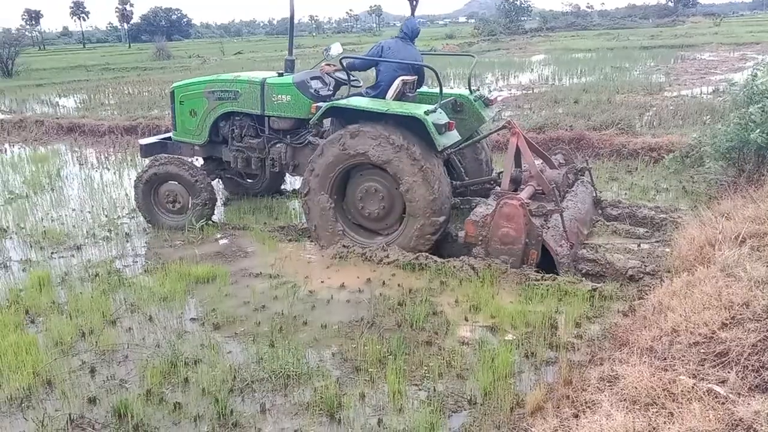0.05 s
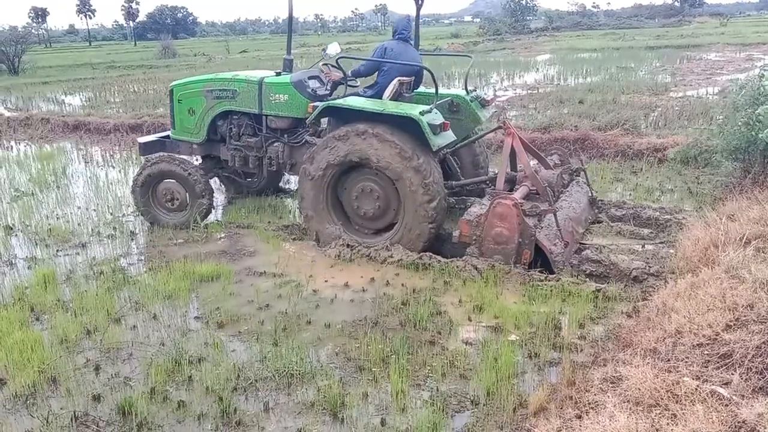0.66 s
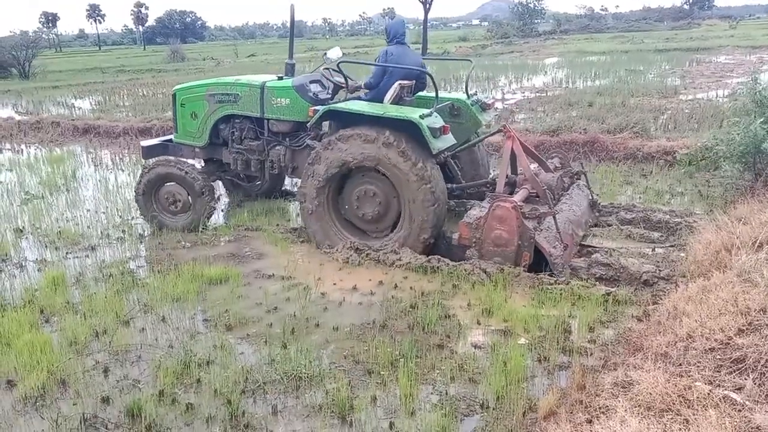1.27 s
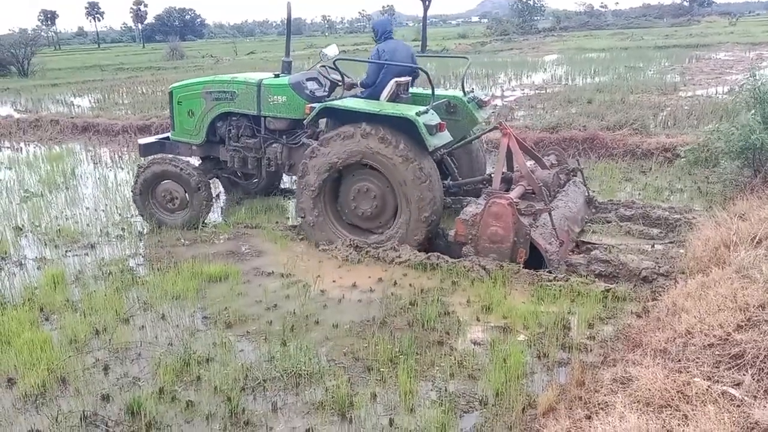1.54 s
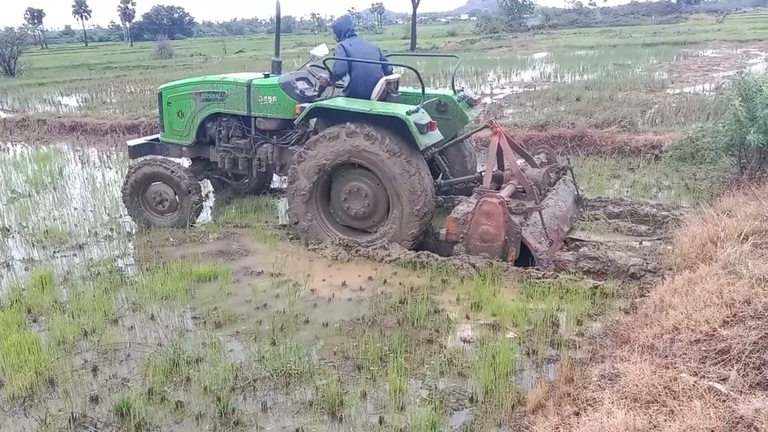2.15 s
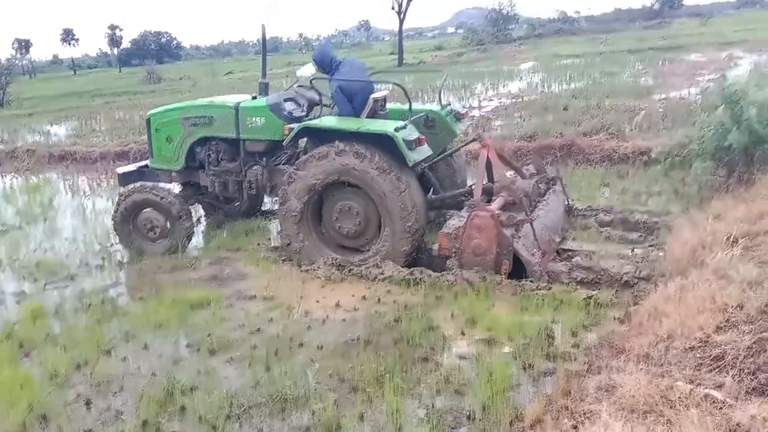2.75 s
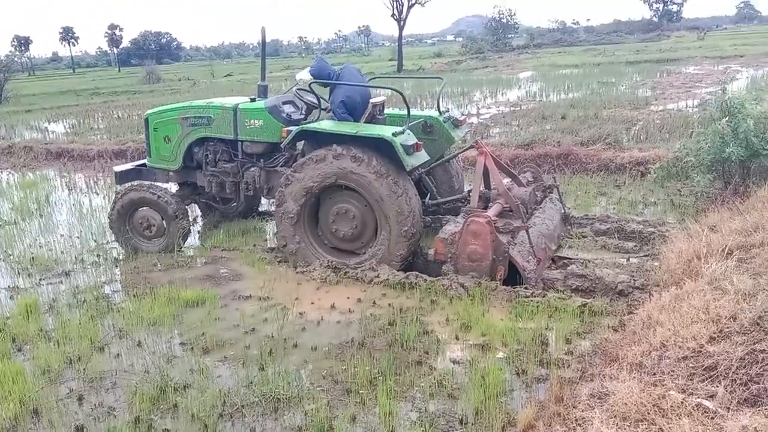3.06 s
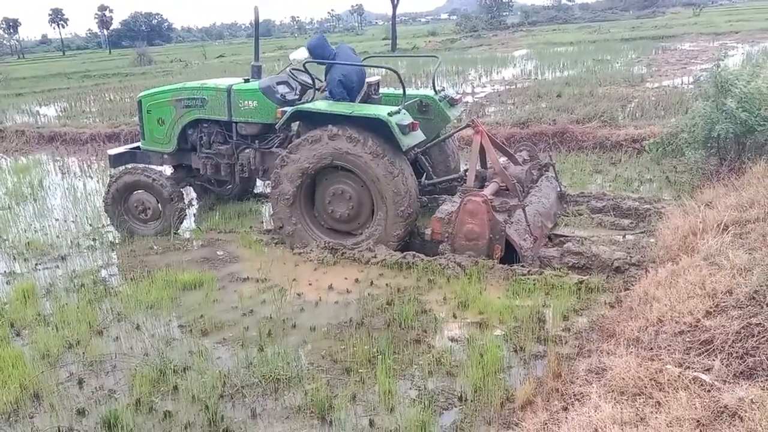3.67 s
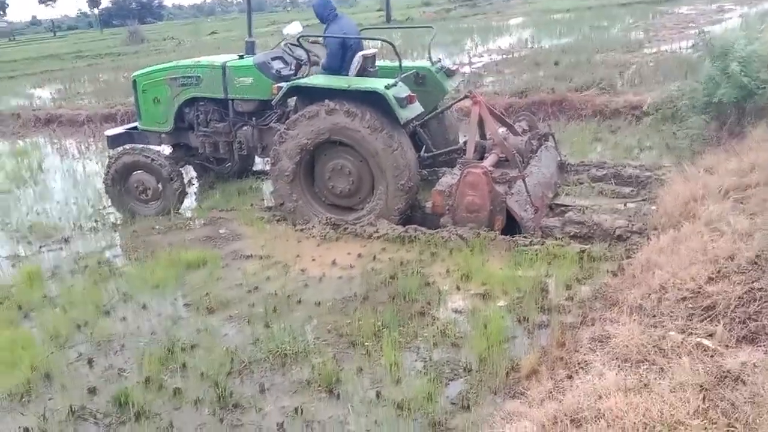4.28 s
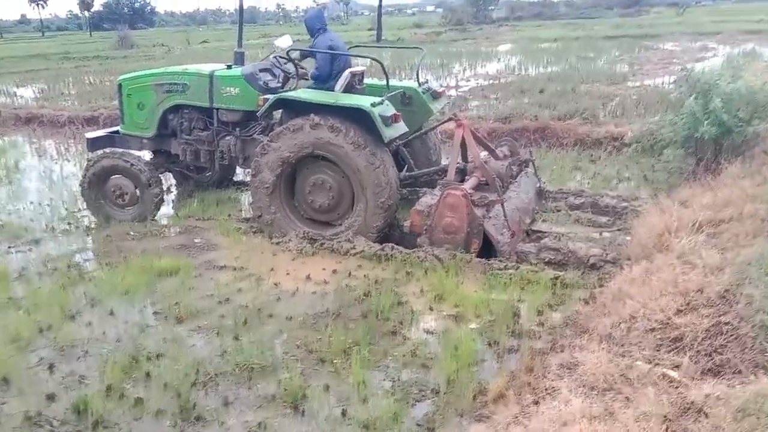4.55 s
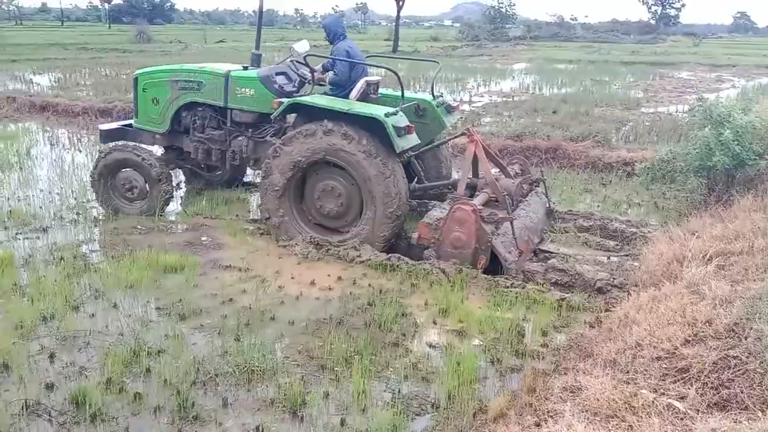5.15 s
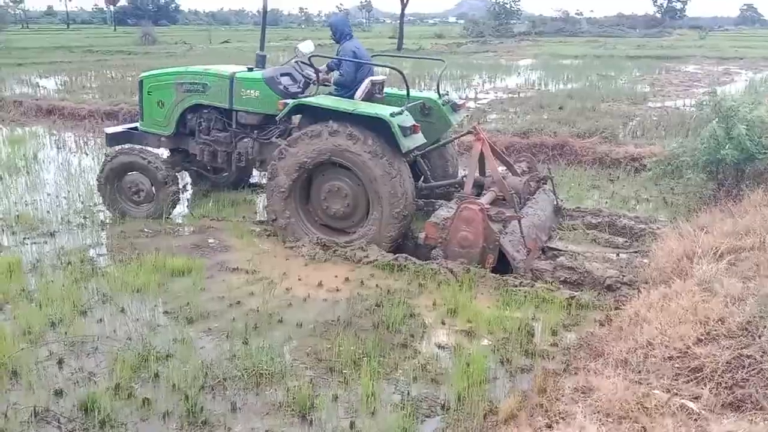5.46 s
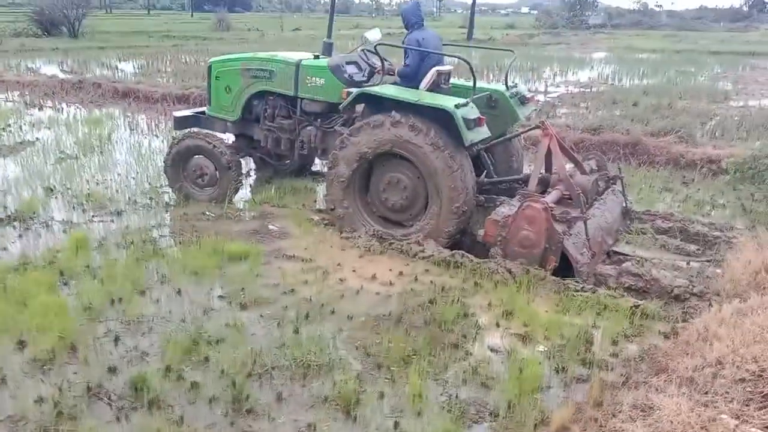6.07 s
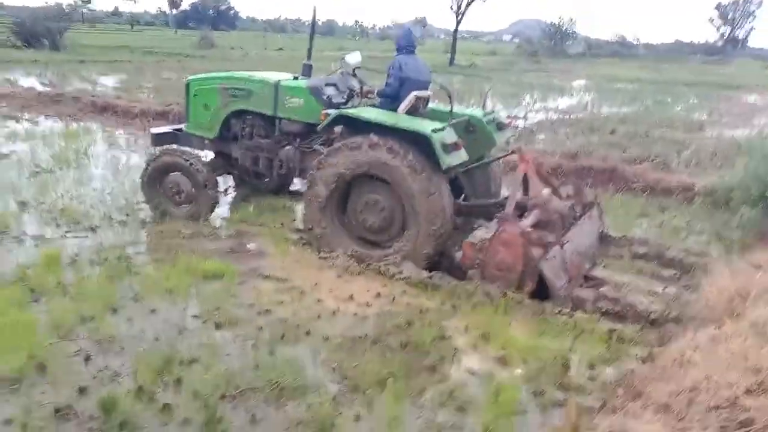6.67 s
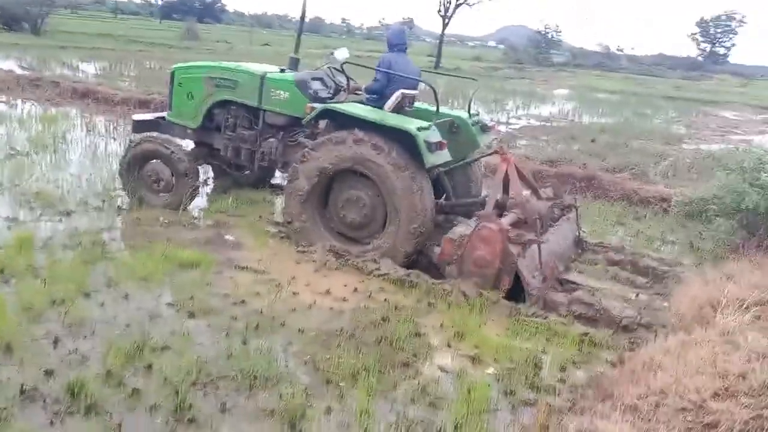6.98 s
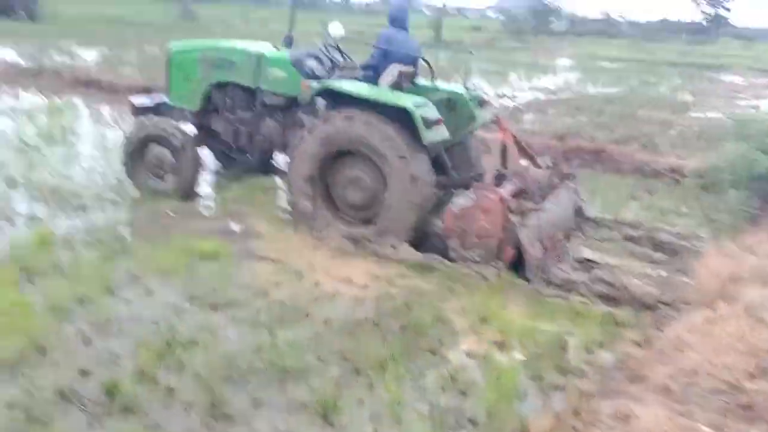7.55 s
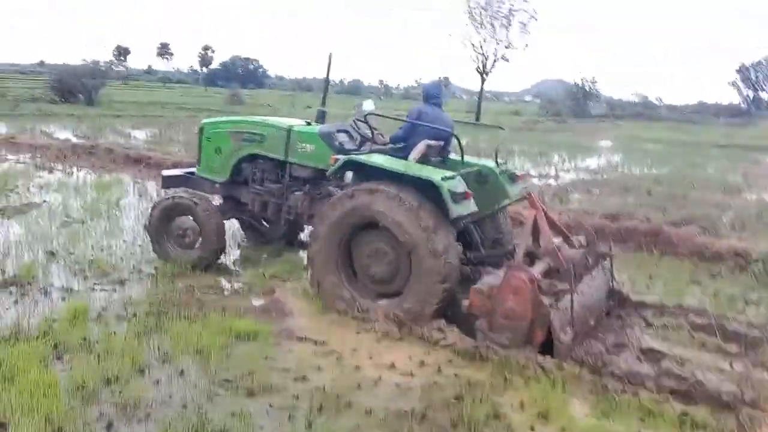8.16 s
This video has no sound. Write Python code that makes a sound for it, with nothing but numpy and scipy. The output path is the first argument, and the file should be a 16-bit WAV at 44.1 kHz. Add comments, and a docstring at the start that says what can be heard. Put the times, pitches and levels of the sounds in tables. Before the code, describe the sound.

Wind rumbles on the microphone as a slowly chugging tractor engine speeds up into a louder, rattling drone under load.

```python
"""A wet paddy: a three-cylinder diesel tractor knocks at idle, then revs up near 5 s and pulls its tiller.
Each firing is a train of impacts that excites the resonances of the block and covers, and sends a
pressure pulse out of the stack. The rotary blades spatter mud; metal ticks, clanks and chirps faintly.
Throughout, the turbulent pressure of gusty wind buffets the microphone."""
import sys
import numpy as np
from scipy import signal
from scipy.fft import rfft, irfft, next_fast_len
from scipy.io import wavfile
from scipy.ndimage import uniform_filter1d, minimum_filter1d, map_coordinates

SR = 44100
rng = np.random.default_rng(int(sys.argv[2]) if len(sys.argv) > 2 else 0)


def master_out(mix):
    """Clip the mix to full scale and print it as 16-bit PCM to the path in sys.argv[1]."""
    frames = np.transpose(np.atleast_2d(mix))
    ceiling = np.clip(frames, -1, 1)
    pcm = np.round(ceiling * 32767).astype(np.int16)
    wavfile.write(sys.argv[1], SR, pcm)


N = 366912

# strength of the knock: t/s, level/dB
KNOCK_LEVEL = [(0, -32.5), (.3, -29.5), (1.76, -30), (2.04, -38.5), (2.26, -32), (2.36, -33), (2.82, -36),
               (3.05, -31.5), (3.75, -35.5), (4.5, -32), (4.93, -30.5), (5.0, -27), (5.3, -22.5),
               (5.48, -28.5), (5.82, -29.5), (6.0, -30.5), (6.38, -22.5), (7.0, -21.5), (7.22, -26.5),
               (7.37, -20), (7.9, -19.5), (8.32, -22.5)]
# treble relative to the knock: t/s, rasp and crack level/dB, sizzle level/dB
TREBLE_BALANCE = [(0, -5.5, -18.5), (1.8, -6.5, -18), (2.03, -10.5, -22.5), (2.24, -8.5, -21.5),
                  (2.4, -8, -22), (4.0, -6, -19.5), (5.3, -7, -20.5), (5.74, -8, -17), (5.9, -47, -28),
                  (7.15, -23.5, -29.5), (7.6, -16.5, -24), (8.32, -22.5, -25)]
COAST_START_S, COAST_HOLD_S, COAST_DB = 1.92, .375, -21  # a brief fuel cut weakens the combustion
def engine():
    """Impact excitation: each firing sets the metal ringing; load hardens it, speed brightens it."""
    knock_db, = curves(KNOCK_LEVEL)
    treble_db, sizzle_db = curves(TREBLE_BALANCE)
    burst = blows()
    sharp = levelled(burst ** 1.35)  # higher partials follow the blows more sharply
    body, rasp = block(burst, sharp)
    sizzle = covers(sharp)
    fizz, bite = revving(sharp)
    crack = amp(treble_db - 4) * ignition_crack(sharp)
    fuel = amp(COAST_DB * swell(COAST_START_S, COAST_HOLD_S, attack=0.12, release=0.019))
    treble = amp(treble_db - 1) * rasp + bite + amp(sizzle_db) * (sizzle + fizz)
    return amp(knock_db) * (fuel * (body + crack) + treble)


# ignition crack, combustion, piston slap, valve seating:
# start/periods, level/dB, decay/periods, change under load/dB
FIRING_BLOWS = [(.035, -7, 0.11, 4), (0.025, -2, 0.45, -4.5), (0.31, -11, 0.11, 7), (0.63, -13.5, .062, -4)]
def blows():
    """Incoherent addition: the blows and the steady clatter sum in power to one envelope."""
    load, clatter_db = effort()
    hardness = np.tanh(load / 0.17)
    power = sum((amp(db + loaded_db * hardness) * firings(start, decay, scatter_db=0.67)) ** 2
                for start, db, decay, loaded_db in FIRING_BLOWS)
    power = np.abs(uniform_filter1d(power, size=SR // 400))  # a knock takes time to spread
    accents = amp(0.7 * wobble(220))  # single impacts stand out in all bands at once
    return levelled(np.sqrt(power + amp(clatter_db + 0.5) ** 2) * accents)


# modes of the block, the hollow unloaded engine and the tiller housing: f/Hz, width/Hz, gain/dB
BLOCK_MODES = [(698, 98, 6.5), (824, 36, 3), (915, 77, 5), (1220, 51, 3), (1428, 56, 9.5), (1700, 63, 7),
               (2400, 210, 6.5), (2640, 29, 3.5), (3190, 80, 1.5), (3430, 160, 6), (3740, 140, 8),
               (4050, 120, 8.5)]
HOLLOW_MODES = [(1525, 79, 7), (1706, 70, -7.5), (2180, 180, -5)]
HOUSING_MODES = [(1317, 49, 8), (1470, 70, -1.5), (2210, 72, 2.5)]
# spectra of the idle knock, loaded drone, hard combustion ring and rasp: f/Hz, level/dB
IDLE_SPECTRUM = [(150, 1.5), (350, -11), (800, 6.5), (1150, 6.5), (1500, -1), (1850, -0.5), (2450, -3.5),
                 (3100, -2), (3500, -19), (4000, -42), (4600, -93)]
DRONE_SPECTRUM = [(150, 10), (350, -4.5), (800, 6.5), (1100, 1), (1500, 2), (1900, 0.5), (2400, 2),
                  (2850, 1.5), (3300, -16.5), (3800, -43.5), (4600, -75.5)]
RING_SPECTRUM = [(1200, -43.5), (2000, -1), (2400, -1.5), (2900, -0.5), (3300, -14.5), (3900, -30),
                 (4600, -74.5)]
RASP_SPECTRUM = [(2200, -34), (2800, 2.5), (3300, 14), (3600, 11), (4000, 1.5), (4250, -8.5), (4500, -28),
                 (4800, -35), (5300, -34.5), (6000, -14), (6600, -23), (8000, -73.5)]
def block(burst, sharp):
    """Modal resonance: impacts ring the block, hollow at idle, joined by the housing under load."""
    load, _ = effort()
    idle_modes, load_modes = BLOCK_MODES + HOLLOW_MODES, BLOCK_MODES + HOUSING_MODES
    idle = shimmer(coloured(burst * rattle(spread_db=1.1, alike=0.37), IDLE_SPECTRUM, idle_modes))
    blunt = levelled(np.sqrt(burst))
    drone = coloured(blunt * rattle(spread_db=0, alike=0.38), DRONE_SPECTRUM, load_modes)
    ring = shimmer(coloured(sharp * rattle(spread_db=1.5, alike=0.61), RING_SPECTRUM, load_modes))
    rasp = shimmer(coloured(sharp * rattle(spread_db=0, alike=0.74), RASP_SPECTRUM, BLOCK_MODES))
    working = amp(-0.54) * drone + amp(-5) * ring
    body = np.sqrt(1 - load) * amp(1.55) * idle + np.sqrt(load) * working
    return body, rasp


# sizzle of the thin engine covers: f/Hz, level/dB
SIZZLE_SPECTRUM = [(5000, -65.5), (5250, -35), (6100, -14.5), (6600, 3.5), (7300, 4), (8500, -1.5),
                   (9300, -24), (10200, -15.5), (11700, -31.5), (13000, -28), (14200, -32.5), (15500, -35)]
# their modes: f/Hz, width/Hz, gain/dB
COVER_MODES = [(5950, 200, 4), (6850, 460, 2.5), (7400, 250, -1), (7820, 240, 2.5), (8770, 350, 5.5),
               (9850, 440, 6)]
def covers(sharp):
    """Plate vibration: the covers snap on each knock until the working tiller keeps them shaking."""
    load, _ = effort()
    snap = levelled(sharp ** (1.3 + 0.8 * load - 1.15 * load * throttle()))
    return shimmer(coloured(snap * rattle(spread_db=2.5, alike=0.37), SIZZLE_SPECTRUM, COVER_MODES))


# bright fizz of the revved engine, and its bite before it takes the load: f/Hz, level/dB
FIZZ_SPECTRUM = [(4600, -46), (6000, -31), (6500, -3.5), (9000, 2), (10000, 1.5), (11700, -5.5),
                 (12900, -2.5), (14200, -14), (15500, -14.5)]
BITE_SPECTRUM = [(3300, -48), (4200, 10.5), (4600, -18), (5300, -5.5), (6200, 5), (7200, -2), (9000, -45)]
def revving(sharp):
    """Amplitude modulation: firings pulse the treble noise; speed under load evens it out."""
    load, clatter_db = effort()
    top_speed = np.clip((firing_rate() - 27) / 2, 0, 1)
    bang = np.hypot(firings(start=0, decay=.3, scatter_db=0.5), amp(clatter_db - 10))
    edge = levelled(bang ** (1 - load) * sharp ** (load * (1.4 - 0.7 * top_speed)))
    fizz = amp(-0.5) * shimmer(coloured(edge * grit(spread_db=2), FIZZ_SPECTRUM), depth_db=1)
    bite = amp(-22.5) * (1 - load) ** 2 * coloured(edge * grit(spread_db=7), BITE_SPECTRUM)
    return throttle() * fizz, throttle() * bite


# the crack at the front of each knock: f/Hz, level/dB
CRACK_SPECTRUM = [(700, -24), (1400, 2.5), (2000, -1.5), (2600, -1.5), (3600, 3.5), (4200, -6.5),
                  (4800, -27.5), (6500, -8), (8500, -24.5), (11000, -34.5)]
def ignition_crack(sharp):
    """Transient excitation: the brief peak of each knock drives the block over a wide band."""
    impacts = levelled(sharp ** 1.58) * grit(spread_db=2.5)
    return shimmer(coloured(impacts, CRACK_SPECTRUM, BLOCK_MODES))


# cylinders in firing order: idle level/dB, revved level/dB
CYLINDER_LEVELS = [(1.6, -.4), (-.4, -.6), (0, 1.1)]
# unusually hard or soft firings: t/s, level change/dB
ODD_FIRINGS = [(.39, -1.5), (.86, 1.5), (.92, 3), (1.51, 2.5), (1.71, 1), (2.13, -1.5), (2.315, 2),
               (2.38, 2.5), (2.56, 1), (2.685, 3), (2.8, 0), (2.985, 1.5), (3.047, 1), (3.4, 1.5),
               (3.952, -0.5), (4.135, 3), (4.455, 2), (4.518, -2), (4.707, -1), (5.15, 0), (5.28, 1.5),
               (5.32, 3), (5.36, 4), (7.4, 2), (7.525, 0), (7.75, 0.5)]
def firings(start, decay, scatter_db):
    """Exponential decay: one blow per firing, sized by its cylinder; start and decay in periods."""
    cycles, onsets = crank()
    k = np.arange(len(onsets))
    idle_db, revved_db = np.array(CYLINDER_LEVELS)[k % len(CYLINDER_LEVELS)].T
    db = idle_db + (revved_db - idle_db) * throttle()[onsets] + scatter_db * rng.standard_normal(len(k))
    for at, extra_db in ODD_FIRINGS:
        db[np.argmin(np.abs(onsets / SR - at))] += extra_db
    which, age = np.divmod(cycles - start, 1)
    return amp(db)[np.clip(which.astype(int), 0, len(k) - 1)] * np.exp(-age / decay)


def rattle(spread_db, alike):
    """Partial coherence: each cylinder repeats the share `alike` of its impact noise power."""
    cycles, onsets = crank()
    k = cycles.astype(int)
    pattern = grit(spread_db)[k % len(CYLINDER_LEVELS) * SR + np.arange(N) - onsets[k]]
    return np.sqrt(alike) * unit(pattern) + np.sqrt(1 - alike) * grit(spread_db)


# engine speed: t/s, firing rate/Hz
ENGINE_SPEED = [(0, 14.9), (.3, 14.9), (.38, 15.65), (.75, 14.59), (1.12, 15.55), (1.6, 15.05), (2.0, 16.9),
                (2.5, 16.21), (3.02, 16.69), (3.25, 16.74), (3.47, 16.44), (3.91, 16.68), (4.51, 15.17),
                (4.91, 17.21), (5.15, 21.49), (5.38, 26.42), (5.62, 27.47), (5.92, 28.44), (6.45, 29.07),
                (7.02, 29.51), (7.28, 26.83), (7.6, 25.89), (7.9, 27.83), (8.32, 28.54)]
def firing_rate():
    """Repetition frequency of the knock, in Hz."""
    return curves(ENGINE_SPEED)[0]


def crank():
    """Phase as the integral of frequency: firings elapsed, and the first sample of each."""
    cycles = .194 + np.cumsum(firing_rate()) / SR
    return cycles, np.searchsorted(cycles, np.arange(int(cycles[-1]) + 1))


def throttle():
    """Speed threshold: 0 at idle, 1 once revved."""
    return np.clip((firing_rate() - 18.5) / .2, 0, 1)


# how hard the engine works: t/s, load (0-1), relative clatter level/dB
ENGINE_EFFORT = [(0, 0.33, -8.5), (1.7, 0.25, -5.5), (2.05, 0.06, -10.5), (4.3, 0, -14.5),
                 (5.3, 0.18, -9.5), (5.6, 0.12, 5.5), (6.3, 0.96, -8.5), (8.32, 0.97, -8.5)]
def effort():
    """Mechanical load, and the steady clatter between firings."""
    return curves(ENGINE_EFFORT)


# timing gears and valves: f/Hz, level/dB
GEAR_SPECTRUM = [(500, -13), (930, 2.5), (1080, -0.5), (1250, -21.5), (1510, 3), (1800, -20.5), (2200, -14),
                 (2400, -3), (2650, -6), (3200, -1.5), (3600, -19.5), (4600, -57.5)]
def gears():
    """Contact noise: gears and valves rattle at every compression, with or without fuel."""
    shake = levelled(firings(start=.05, decay=0.69, scatter_db=1))
    return amp(-36.5) * coloured(shake * grit(spread_db=0.5), GEAR_SPECTRUM)


# puffs from the stack: f/Hz, level/dB
EXHAUST_SPECTRUM = [(25, -33), (55, 1), (100, 7), (170, -5), (300, -4), (600, -23.5), (1500, -69)]
def exhaust():
    """Monopole radiation: each puff sounds by its rate of change of flow, stronger with speed."""
    speed = firing_rate()
    flow = firings(start=.1, decay=0.12, scatter_db=4)
    pulse = coloured(np.gradient(flow), EXHAUST_SPECTRUM)
    rush = coloured(flow * rng.standard_normal(N), EXHAUST_SPECTRUM)
    return amp(-32.5) * (speed / speed.mean()) ** 1.4 * (pulse + 0.61 * rush)


# wet slaps of mud: f/Hz, level/dB
MUD_SPECTRUM = [(200, -28), (600, -3.5), (1400, 6.5), (3000, -46), (4500, -41)]
def tiller():
    """Shot noise: under load the blades throw a dense, random spray of small wet slaps."""
    load, _ = effort()
    when, size = rng.random((700, 2)).T
    spray = fading(impulses(when * N / SR, size), decay=0.0058) * rng.standard_normal(N)
    return amp(-32.5) * load * coloured(spray, MUD_SPECTRUM)


# sharp ticks and spatters, and the bright crack of a few hard firings near the start: t/s, relative level/dB,
# clack offset/dB, tick decay/s
CONTACTS = [(0.188, -27.5, -4, 0.0099), (0.26, -24.5, 13, 0.015), (0.324, -23, 8, 0.014),
            (0.755, -16, -16, .002), (0.925, -28, 4, .008), (1.58, -28, -5, 0.0074),
            (2.442, -22.5, 14, 0.0055), (2.450, -22.5, 18.5, .004), (2.466, -38.5, 18, .005),
            (2.892, -31, -12, 0.0044), (2.928, -21.5, -14, 0.004), (3.385, -28, 18.5, 0.004),
            (3.493, -31.5, 9, 0.0072), (7.630, -20, 14, 0.011)]
# spectra of the tick and the clack: f/Hz, level/dB
TICK_SPECTRUM = [(5000, -29), (6500, 9.5), (9000, 5.5), (12000, -6.5), (15500, -16.5)]
CLACK_SPECTRUM = [(800, -32), (2200, -14), (2900, 0), (3300, -5), (4000, -21), (4700, -69), (7000, -89)]
def ticks():
    """Impact transients: a bright tick over a lower clack that takes a moment to ring up."""
    times, db, clack_db, _ = np.transpose(CONTACTS)
    tick = sum(fading(impulses(np.array([at]), [amp(level_db - 13.5)]), decay)
               for at, level_db, _, decay in CONTACTS)
    strikes = impulses(times, amp(db + clack_db - 5.5))
    clack = (fading(strikes, .0036) - fading(strikes, .0011)) * steady_noise(CLACK_SPECTRUM)
    return tick * coloured(rng.standard_normal(N), TICK_SPECTRUM) + clack


# knocks on loose metal: t/s, relative level/dB, f/Hz
METAL_CLANKS = [(0.856, -17, 3700), (0.924, -14, 3940), (2.128, -16, 3350), (5.148, -33, 3930),
                (5.195, -19, 4130), (5.276, -7, 2960), (5.355, -23, 4160), (5.392, -23, 4130),
                (7.676, -16, 8750), (7.791, -8, 3220), (7.856, 0, 2350)]
def clanks():
    """Damped free vibration: a loose part, shaken by a hard firing, rings for a moment."""
    rise_s, decay_s = 0.0041, 0.0047
    out, t = np.zeros(N + SR), np.arange(SR // 10) / SR
    ring = (1 - np.exp(-t / rise_s)) * np.exp(-t / decay_s)
    for at, db, hz in METAL_CLANKS:
        out[round(at * SR):][:len(t)] += amp(db) * ring * rough_tone(t, hz, width_hz=230)
    return out[:N]


# chirps of rubbing metal: t/s, duration/s, level/dB
METAL_CHIRPS = [(3.327, .12, -53), (5.71, 0.045, -45), (5.918, .035, -47), (6.401, .045, -50),
                (6.465, 0.035, -45), (6.635, .035, -44), (6.818, 0.068, -45), (7.075, 0.041, -48),
                (7.59, 0.03, -44), (7.786, 0.027, -32), (7.81, .035, -39), (7.875, .08, -42),
                (8.024, .06, -37)]
def chirps():
    """Friction-excited vibration: rubbing metal sings briefly on a high, rough note."""
    out = np.zeros(N + SR)
    for at, length, db in METAL_CHIRPS:
        t = np.arange(round(length * SR)) / SR
        arch = amp(db) * np.sin(np.pi * t / length)
        out[round(at * SR):][:len(t)] += arch * rough_tone(t, hz=9960, width_hz=710)
    return out[:N]


# single hard buffets: t/s, relative level/dB, flutter offset/dB
WIND_BUFFETS = [(.005, -8.5, -7.5), (0.384, -11.5, -2), (0.589, -3.5, -9), (.884, -3.5, -9.5),
                (1.051, -8, -11), (1.432, -3.5, -18), (1.54, -9, -5), (1.858, -7, -8), (1.94, -5.5, -18),
                (2.034, -2, -21), (2.213, -10, -19), (2.386, -6, -13.5), (2.495, -5, -17), (2.59, -8.5, -2),
                (2.705, -14.5, 3.5), (2.778, -4, -4), (2.829, -12, -22), (2.85, 0.5, -7),
                (3.473, -5.5, -17), (3.535, -7.5, -15), (3.779, -3.5, -12), (4.07, 0.5, -10),
                (4.23, -6, -10), (4.303, -2.5, -17.5), (4.838, -5, -22), (4.953, -10.5, -3),
                (5.424, -4.5, -12), (5.569, -1, -7), (5.772, -2.5, -8.5), (5.843, -5, -4.5),
                (5.916, -4.5, 1.5), (5.955, -2.5, -6), (5.985, -9, 3), (6.053, -12, 4.5), (6.254, 0, -17),
                (7.138, -1, -14)]
# low rumble and higher flutter of the wind: f/Hz, level/dB
RUMBLE_SPECTRUM = [(15, -57), (30, -29.5), (50, -17.5), (80, -2), (140, 1.5), (220, -3.5), (320, -12.5),
                   (500, -27.5), (900, -90.5)]
FLUTTER_SPECTRUM = [(100, -19), (220, 2.5), (330, 2.5), (450, -2.5), (650, -10), (1000, -15.5),
                    (2000, -71.5), (4000, -110)]
DENSE_DB = -15  # gust strength at which the eddies merge
def wind():
    """Turbulent pressure: eddies hit the microphone in lumps that merge to a roar in strong gusts."""
    low, high = airflow()
    times, level_db, flutter_db = np.transpose(WIND_BUFFETS)
    merging = 1 + (np.hypot(low, high) / amp(DENSE_DB)) ** 4
    lumps = unit(wobble(50) + 0.5 * wobble(15)) / merging

    def buffets(db):
        """Pressure pulses with a fast rise and slower decay."""
        hits = impulses(times, amp(db))
        return fading(hits, 0.011) - fading(hits, 0.0032)

    rumble = np.hypot(low * levelled(amp(3.34 * lumps), SR // 5), buffets(level_db - 0.5))
    flutter = np.hypot(high * levelled(amp(3.55 * lumps), SR // 5), buffets(level_db + flutter_db + 3.5))
    return rumble * steady_noise(RUMBLE_SPECTRUM) + flutter * steady_noise(FLUTTER_SPECTRUM)


# gusts: t/s, hold/s, rumble level/dB, flutter re rumble/dB
WIND_GUSTS = [(-.04, 0.065, -25.5, 4.5), (0.204, 0.5, -22.5, -2), (0.865, 0.23, -25.5, -4.5),
              (1.175, 0.43, -29.5, 1), (1.787, 0.26, -22, -0.5), (2.09, 0.12, -24, -5.5),
              (2.338, 0.26, -21.5, -0.5), (2.82, 0.32, -20, -3.5), (3.186, 0.17, -18, -4.5),
              (3.77, 0.38, -21, -1), (4.472, 0.12, -17.5, -11), (4.68, 0.036, -23, -20),
              (4.876, 0.43, -25, -17), (5.5, 0.25, -24, 1.5), (5.76, 0.31, -24.5, 7),
              (6.223, 0.15, -22.5, -22), (6.74, 0.2, -16.5, -12.5), (6.95, 0.25, -17.5, -1.5),
              (7.31, 1, -21, -5), (8.177, 0.094, -14, -3.5)]
# lulls: t/s, hold/s, rumble change/dB
WIND_LULLS = [(1.658, 0.11, -2.5), (2.254, 0.034, -1), (2.712, 0.018, -11), (3.6, 0.2, -5.5),
              (4.319, 0.083, -10), (6.11, 0.21, 0.5)]
BREEZE_RUMBLE_DB, BREEZE_FLUTTER_DB = -23.5, -33.5
def airflow():
    """Power addition: gusts ride on a breeze; in lulls the flutter drops further than the rumble."""
    low, high = amp(BREEZE_RUMBLE_DB) ** 2, amp(BREEZE_FLUTTER_DB) ** 2
    for start, hold, db, flutter_db in WIND_GUSTS:
        gust = amp(db) * swell(start, hold, attack=0.024, release=0.082)
        low, high = low + gust ** 2, high + (amp(flutter_db) * gust) ** 2
    calm_db = sum(db * swell(start, hold, attack=0.022, release=0.022) for start, hold, db in WIND_LULLS)
    return np.sqrt(low) * amp(calm_db), np.sqrt(high) * amp(2.4 * calm_db)


def coloured(x, spectrum, modes=()):
    """Minimum-phase filtering: x takes on this spectrum and these resonances, at rms 1."""
    size = 8192
    hz = np.fft.rfftfreq(size, 1 / SR)
    f, db = np.transpose(spectrum)
    level = np.interp(np.log(hz + 1), np.log(f), db)
    for centre, width, lift in modes:
        level = level + lift / (1 + (2 * (hz - centre) / width) ** 2)
    cepstrum = irfft(np.log(amp(level)))[:size // 2]
    cepstrum[1:] *= 2  # folding makes the filter causal
    response = irfft(np.exp(rfft(cepstrum, size)))
    return unit(signal.oaconvolve(x, response)[:N])


def shimmer(x, depth_db=3.5):
    """Spectral fluctuation: brief random patches of louder and softer frequencies blotch the clatter."""
    spectra = signal.stft(x, nperseg=512)[2]
    field = uniform_filter1d(rng.standard_normal(spectra.shape), size=3, axis=0)
    field = unit(uniform_filter1d(field, size=5, axis=1))
    return unit(signal.istft(spectra * amp(depth_db * field), nperseg=512)[1][:N])


def grit(spread_db):
    """Modulated noise: tiny impacts of unequal size."""
    return unit(rng.standard_normal(N) * amp(spread_db * wobble(1500)))


def steady_noise(spectrum):
    """Filtered noise of even strength."""
    return levelled(coloured(rng.standard_normal(N), spectrum), size=SR // 25)


def rough_tone(t, hz, width_hz):
    """Line broadening: a tone whose phase wanders at random."""
    real, imag = (map_coordinates(k, [t * width_hz]) for k in rng.standard_normal((2, len(t))))
    return np.sin(2 * np.pi * hz * t + np.angle(1 + real + 1j * imag))


def wobble(rate):
    """Smooth random fluctuation, rate knots a second."""
    return map_coordinates(rng.standard_normal(int(N * rate / SR) + 4), [np.arange(N) * rate / SR])


def impulses(times, sizes):
    """Impulse train: one spike at each time."""
    return np.bincount(np.clip(np.round(times * SR).astype(int), 0, N), sizes, N + 1)[:N]


def fading(spikes, decay):
    """Exponential damping of each spike; decay in seconds."""
    return signal.lfilter([1], [1, -np.exp(-1 / (SR * decay))], spikes)


def swell(start, hold, attack, release):
    """Trapezoidal envelope: rises at start, falls from start + hold; all in seconds."""
    t = np.arange(N) / SR - start
    return np.clip(np.minimum(t / attack, 1 - (t - hold) / release), 0, 1)


def curves(rows):
    """Linear interpolation of each column after the time, one value per sample."""
    times, *columns = np.transpose(rows)
    return [np.interp(np.arange(N) / SR, times, column) for column in columns]


def levelled(x, size=SR // 3):
    """Running normalisation: removes swells slower than size samples."""
    return x / np.sqrt(np.abs(uniform_filter1d(x ** 2, size=size)) + 1e-12)


def unit(x):
    """Normalisation to rms 1."""
    return x / np.sqrt(np.mean(x ** 2) + 1e-20)


def amp(db):
    """Decibels to amplitude ratio."""
    return 10 ** (np.asarray(db) / 20)


def scene():
    """Superposition: the tractor in the open field and the wind at the microphone."""
    return (engine() + gears() + exhaust() + tiller() + ticks() + clanks() + chirps() + wind())[None]


CEILING, LOOK_AHEAD_S = .84, .004
LOW_CUT_HZ, DIP_HZ, DIP_WIDTH_HZ, TOP_HZ = 41, 4896, 230, 15800
def record(dry):
    """Limiting and filtering: peaks are held, deep bass rolls off, the treble is notched and cut off."""
    reach = round(LOOK_AHEAD_S * SR)
    gain = CEILING / np.maximum(np.abs(dry), CEILING)
    held = dry * uniform_filter1d(minimum_filter1d(gain, size=2 * reach), size=reach)
    size = next_fast_len(N + SR // 2)
    hz = np.fft.rfftfreq(size, 1 / SR)
    low_cut = hz ** 3 / np.hypot(hz ** 3, LOW_CUT_HZ ** 3)
    dip = amp(-26 * np.exp(-((hz - DIP_HZ) / DIP_WIDTH_HZ) ** 2))
    return irfft(rfft(held, size) * low_cut * dip * (hz < TOP_HZ), size)[..., :N]


dry = scene()
out = record(dry)
master_out(out)
```